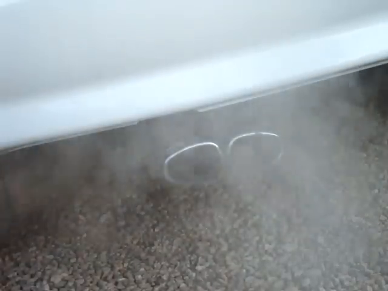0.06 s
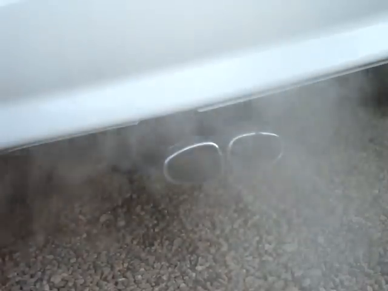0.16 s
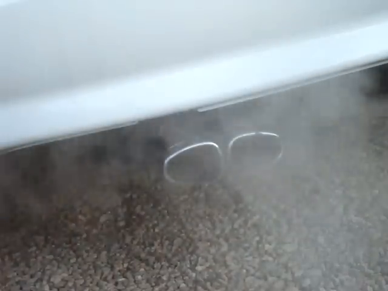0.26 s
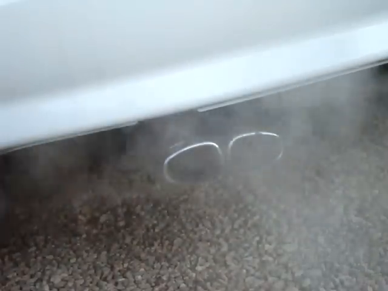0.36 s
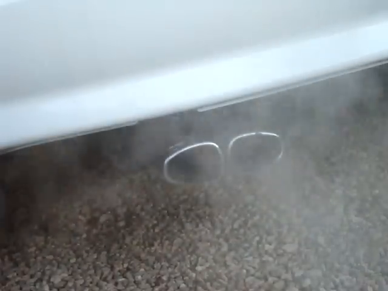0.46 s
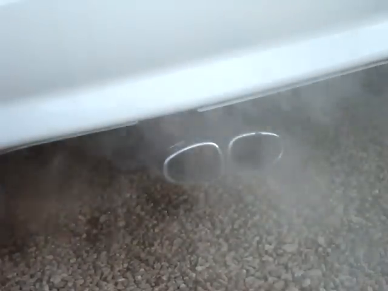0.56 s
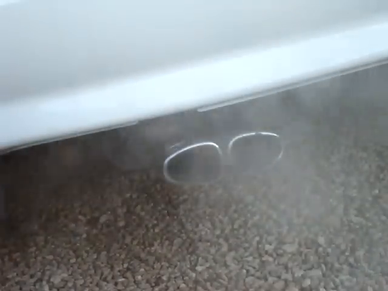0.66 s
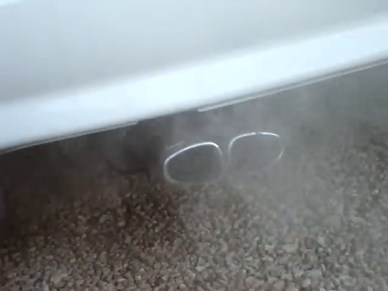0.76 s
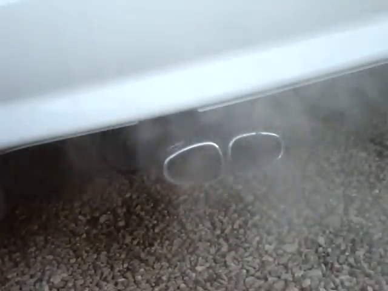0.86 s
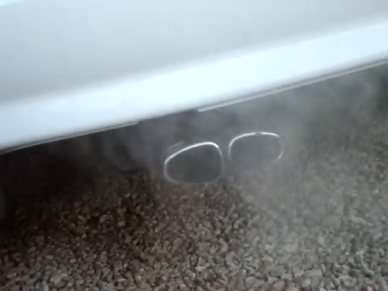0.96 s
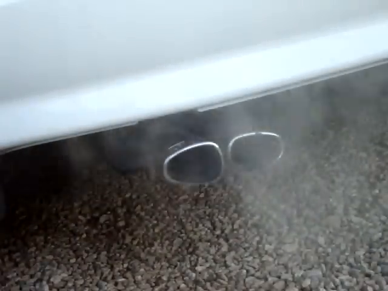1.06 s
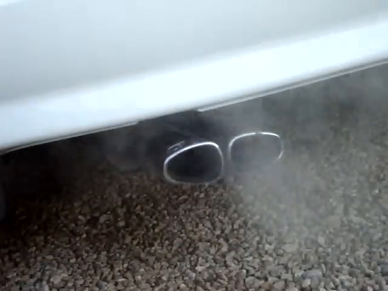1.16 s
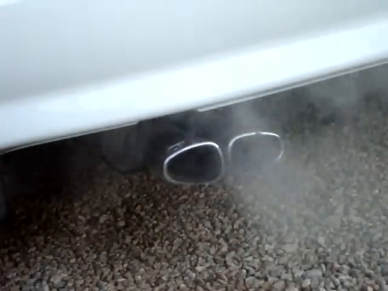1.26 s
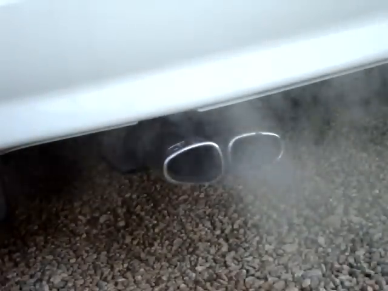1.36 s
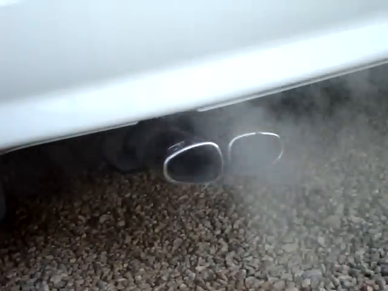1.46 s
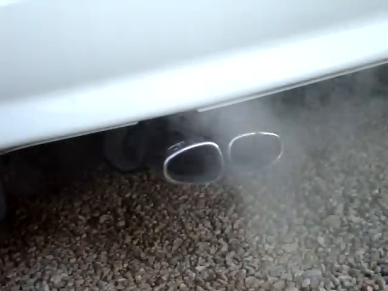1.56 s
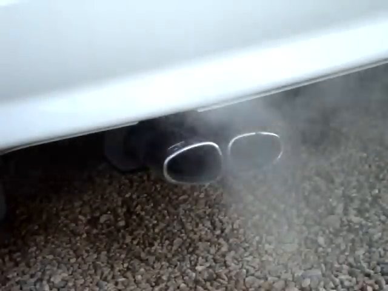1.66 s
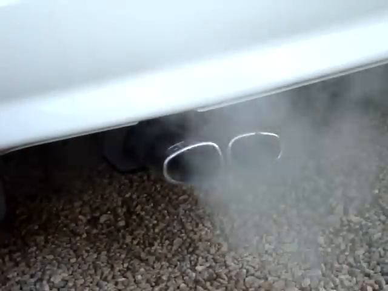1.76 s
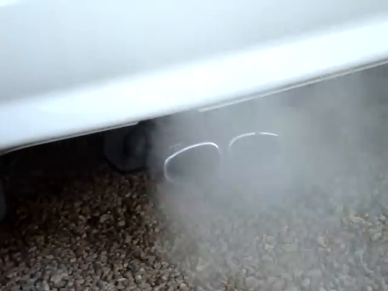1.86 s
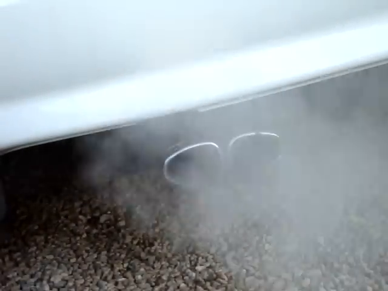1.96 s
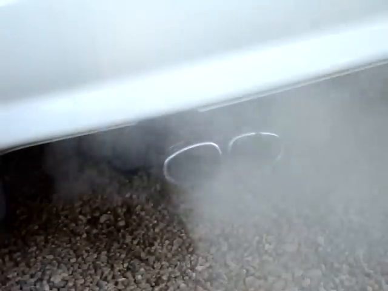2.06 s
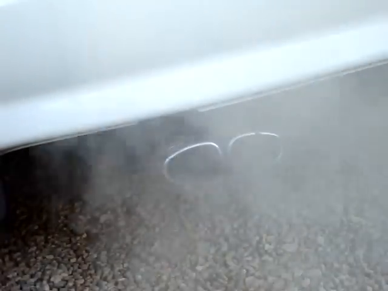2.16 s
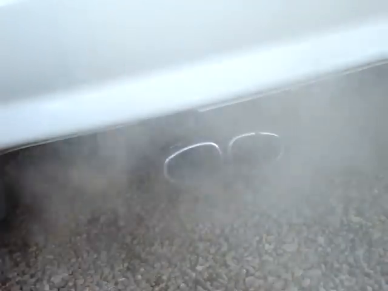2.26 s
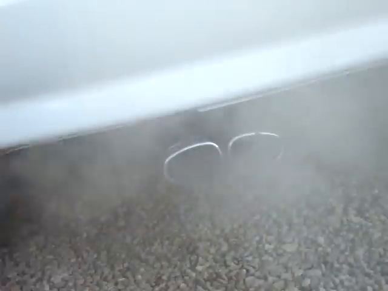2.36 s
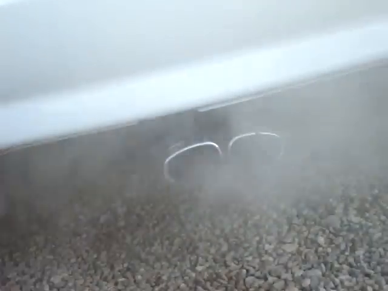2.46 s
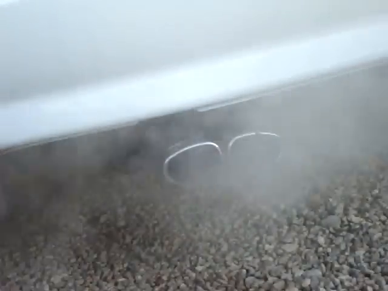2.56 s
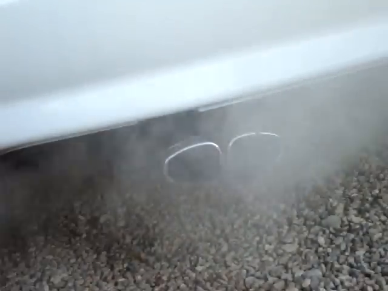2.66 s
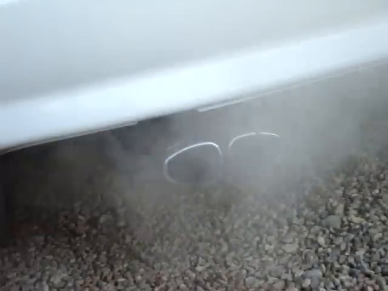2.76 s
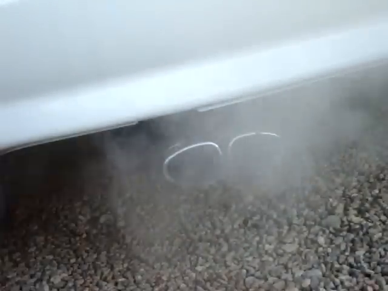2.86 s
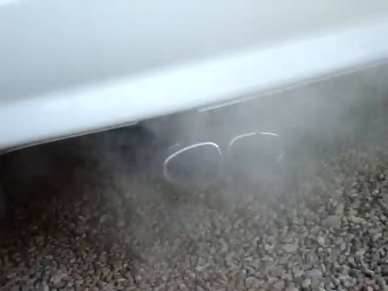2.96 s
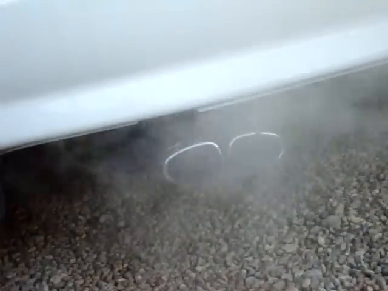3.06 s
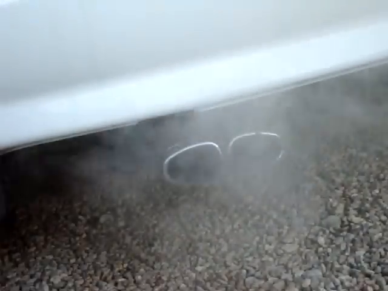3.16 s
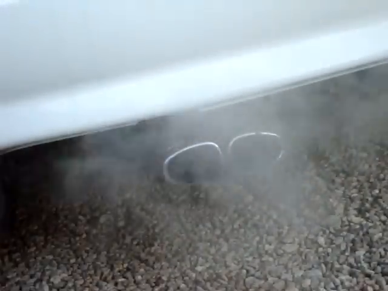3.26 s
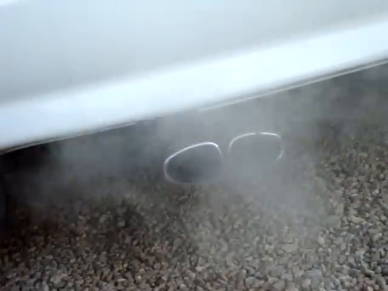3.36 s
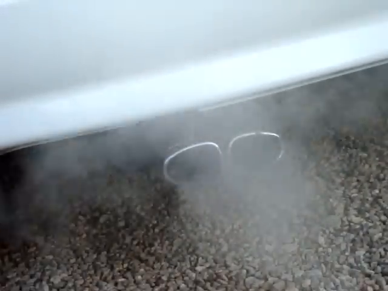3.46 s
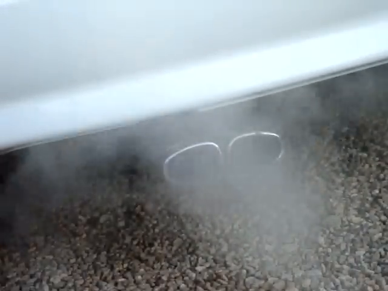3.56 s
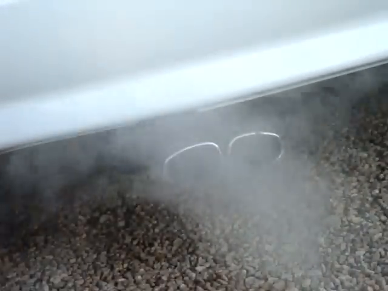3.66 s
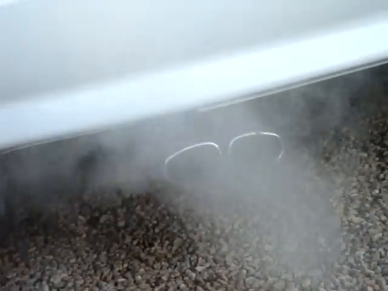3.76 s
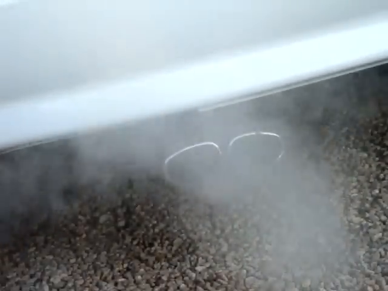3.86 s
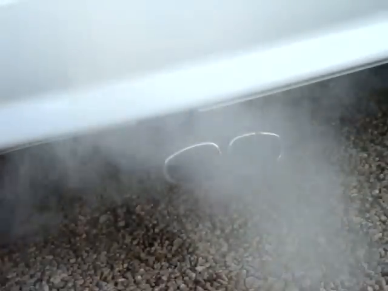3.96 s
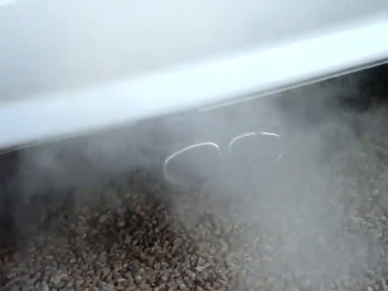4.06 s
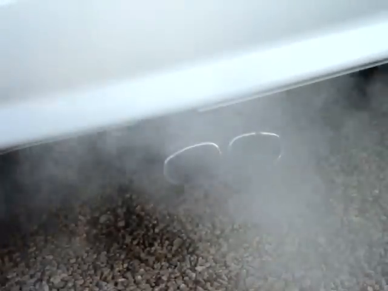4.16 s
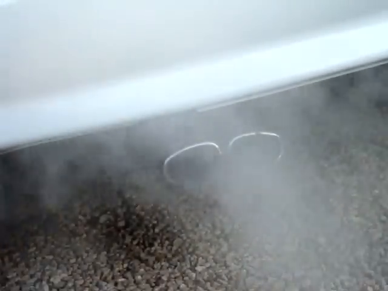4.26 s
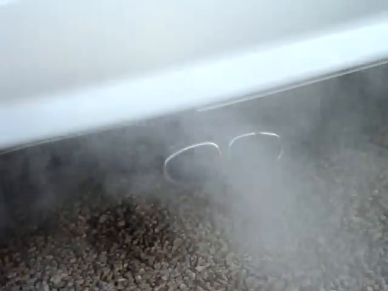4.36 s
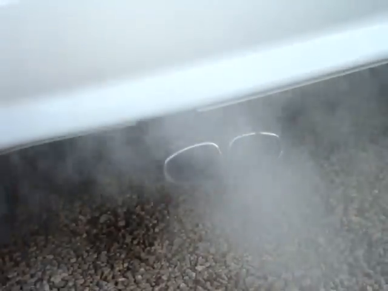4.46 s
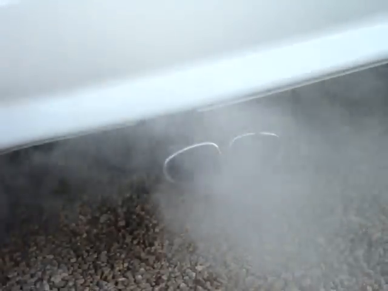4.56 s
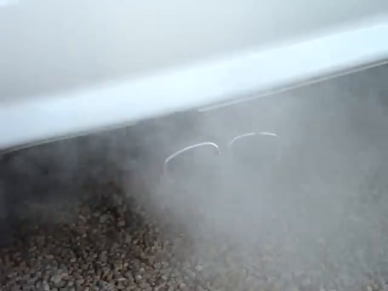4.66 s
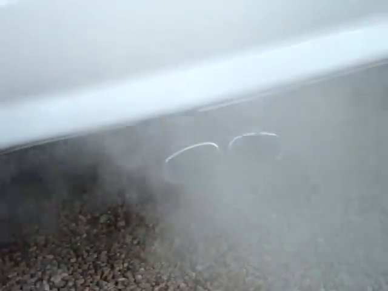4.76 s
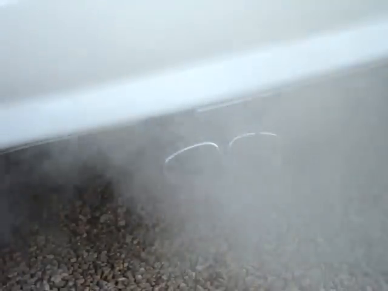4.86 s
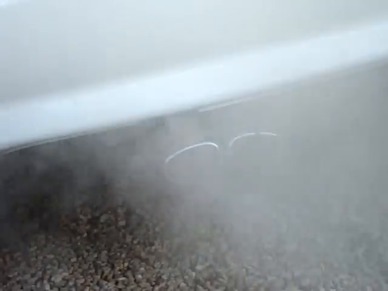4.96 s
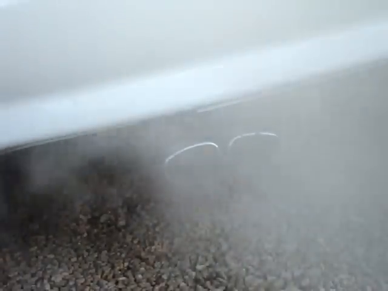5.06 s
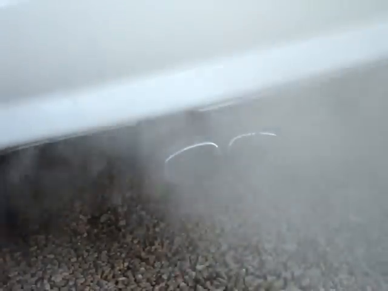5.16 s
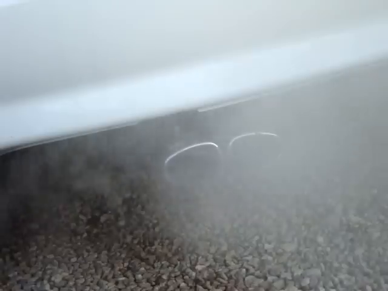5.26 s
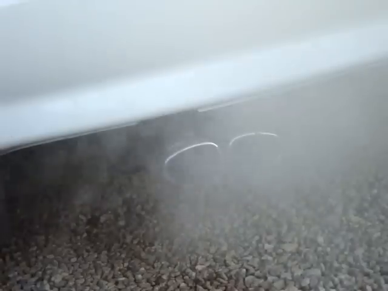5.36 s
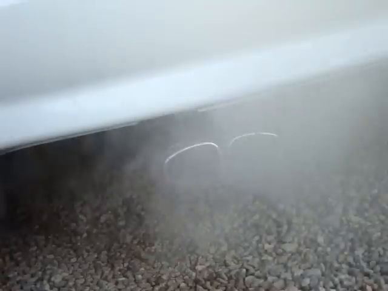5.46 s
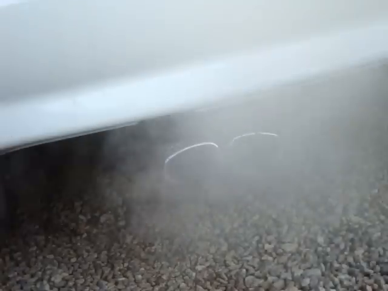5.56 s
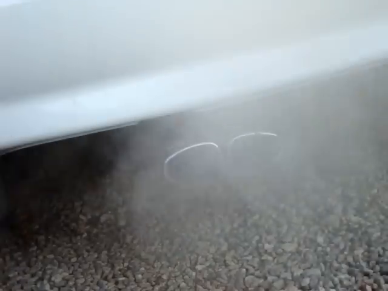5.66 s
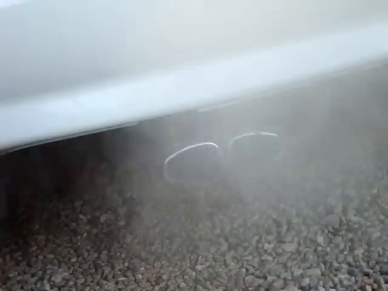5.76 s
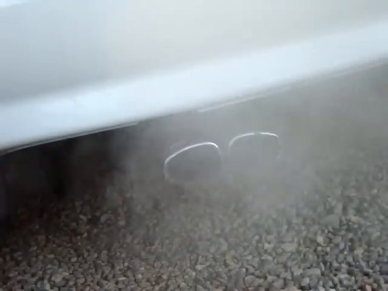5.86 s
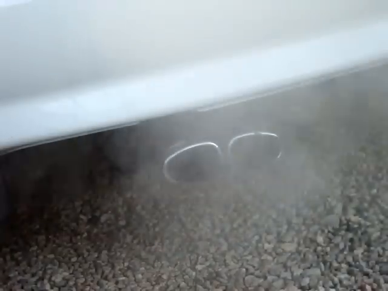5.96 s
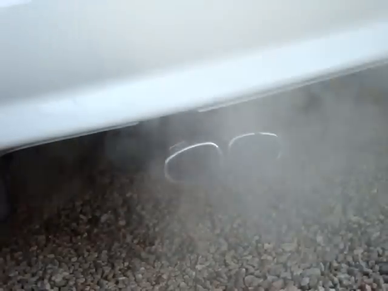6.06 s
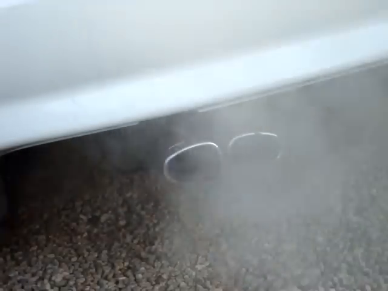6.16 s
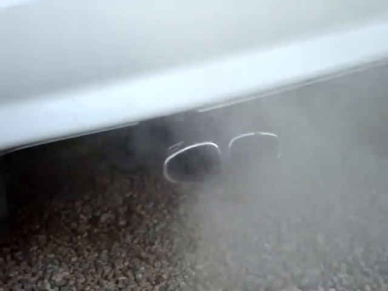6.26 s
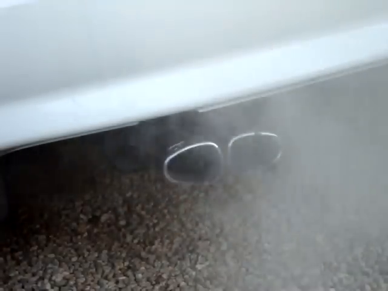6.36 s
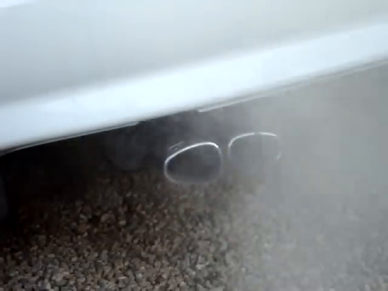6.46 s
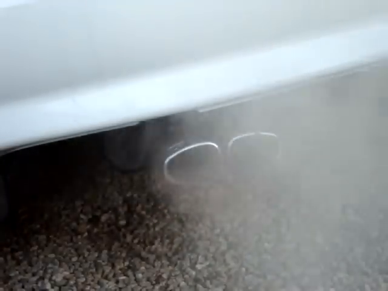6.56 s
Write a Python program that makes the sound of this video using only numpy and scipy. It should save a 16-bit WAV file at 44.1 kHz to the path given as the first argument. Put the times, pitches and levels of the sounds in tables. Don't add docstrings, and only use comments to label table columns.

```python
import sys
import numpy as np
from scipy import signal
from scipy.fft import rfft, irfft
from scipy.io import wavfile
from scipy.ndimage import uniform_filter1d, minimum_filter1d

SR = 44100
rng = np.random.default_rng(int(sys.argv[2]) if len(sys.argv) > 2 else 0)


def boost_factor(decibels):
    exponent = np.asarray(decibels, float) / 20
    return 10 ** exponent


def inscribe(sig):
    pcm = np.round(np.clip(np.atleast_2d(sig).T, -1, 1) * 32767)
    wavfile.write(sys.argv[1], SR, pcm.astype(np.int16))


N = 291501


def unit(x):
    return x / np.sqrt(np.mean(x ** 2))


def steady(x, span_s=0.11):
    k = int(span_s * SR)
    power = uniform_filter1d(uniform_filter1d(x ** 2, k), k)
    return x / np.sqrt(power + 1e-12)


def sos_filter(x, order, hz, kind):
    return signal.sosfilt(signal.butter(order, hz, kind, fs=SR, output="sos"), x)


def modes(x, table):
    total = 0
    for k, (hz, width_hz, db) in enumerate(table):
        b, a = signal.iirpeak(hz, hz / width_hz, SR)
        total = total + (-1) ** k * boost_factor(db) * signal.lfilter(b, a, x)
    return total


def clicks(s, size):
    place = np.clip(s * SR, 0, N - 2)
    i = place.astype(int)
    early = np.bincount(i, size * (1 - place + i), N)
    late = np.bincount(i + 1, size * (place - i), N)
    return early + late


def puff(x, decay_s, rise_s):
    for tau in (decay_s, rise_s):
        p = np.exp(-1 / (tau * SR))
        x = signal.lfilter([1 - p], [1, -p], x)
    return x * decay_s * SR


def push(s, size, length_s):
    window = np.hanning(int(length_s * SR) + 2)
    return np.convolve(clicks(s, size), window / window.sum())[:N]


def front(s, size):
    x = puff(clicks(s + .0012, size) - clicks(s, .7 * size), .0006, .00022)
    return 2 * sos_filter(x, 3, [170, 2400], "band")


def ramp(t, start_s, length_s):
    return np.clip((t - start_s) / length_s, 0, 1)


# f/Hz, spectral level/dB
AIR_SPECTRUM = [(20, -4.5), (40, -1.5), (90, -13), (200, 8), (600, 0), (1500, -34.5), (3500, -18.5),
                (10200, -28.5)]


def air():
    hz, db = np.transpose(AIR_SPECTRUM)
    shape = boost_factor(np.interp(np.log(np.fft.rfftfreq(N, 1 / SR) + 1), np.log(hz), db))
    hiss = irfft(rfft(rng.standard_normal(N)) * shape, N)
    return boost_factor(-44) * unit(hiss)


# t/s, length/s, start f/Hz, end f/Hz, level/dB
BIRD_NOTES = [(0.189, 0.06, 4360, 4560, -42), (0.246, 0.056, 4270, 3470, -48),
              (0.302, 0.027, 3290, 2960, -36.5), (1.029, 0.11, 4070, 3970, -46),
              (1.112, 0.07, 3580, 3450, -44.5), (1.145, 0.066, 4400, 4740, -45),
              (1.223, 0.023, 4600, 3700, -41), (1.257, 0.017, 3320, 3030, -31.5),
              (1.607, 0.087, 6630, 5660, -49), (2.505, 0.093, 3960, 3850, -62),
              (2.593, 0.042, 4000, 4800, -37), (2.573, 0.17, 3300, 3450, -42.5),
              (2.713, 0.014, 3130, 2880, -29.5), (3.82, 0.17, 4184, 3940, -37.5),
              (3.921, 0.024, 4850, 4460, -37), (3.924, 0.04, 3440, 3340, -31.5),
              (4.203, 0.094, 4620, 4360, -40), (4.286, 0.023, 3380, 3100, -36),
              (4.333, 0.065, 3230, 3040, -36), (4.432, 0.063, 3950, 4280, -39),
              (5.09, .06, 3890, 3700, -44), (5.899, 0.072, 3270, 4840, -40.5),
              (5.984, 0.057, 4570, 4530, -36), (5.941, 0.11, 3890, 3710, -38)]


def birds():
    dry = np.zeros(N)
    flutter = uniform_filter1d(uniform_filter1d(rng.standard_normal(N), size=45), size=45)
    for s, length_s, start_hz, end_hz, db in BIRD_NOTES:
        n = int(length_s * SR)
        u = np.arange(n) / n
        phase = 2 * np.pi * np.cumsum(start_hz + (end_hz - start_hz) * u) / SR
        start = int(s * SR)
        dry[start:start + n] += boost_factor(db) * np.sin(np.pi * u) * np.sin(phase)
    dry *= .6 + .6 * unit(flutter)
    lag = np.arange(SR // 4) / SR
    echoes = .022 * rng.standard_normal(len(lag)) * np.exp(-lag / .028)
    return .5 * dry + signal.fftconvolve(dry, echoes)[:N]


# t/s, front level/dB, boom level/dB, sizzle level/dB
POP_EVENTS = [(1.9035, -10, -24, -32), (4.547, -14, -24, -36), (4.5925, -15, -24, -36),
              (4.6145, -8, -22, -32), (4.6335, -14, -26, -35), (4.7365, -13, -24, -33),
              (5.2425, -13, -18, -31), (5.2755, -14, -17, -26), (5.3275, -17, -16, -31),
              (5.474, -30, -7, -50), (5.5345, -13, -22, -32), (5.56, -30, -30, -38), (5.577, -28, -12, -40),
              (5.6615, -30, -40, -36), (5.83, -40, -17, -55), (6.1385, -12, -24, -34),
              (6.1575, -13, -24, -33), (6.1775, -12, -26, -33)]


def pops():
    s, peak_db, boom_db, sizzle_db = np.transpose(POP_EVENTS)
    s = s + .002
    blow = 1.5 * front(s, boost_factor(peak_db))
    thump = modes(push(s, boost_factor(boom_db + 50), .002), [(275, 22, 0), (320, 40, -9)])
    fizz = modes(rng.standard_normal(N), TIP_MODES + RUSH_MODES)
    fizz = unit(sos_filter(fizz, 2, 4200, "low"))
    return blow + thump + puff(clicks(s, boost_factor(sizzle_db)), .012, .0006) * 1.3 * fizz


# down t/s, up t/s, fuel cut t/s, opening 0-1, afterburn fade/s
PEDAL_STROKES = [
    (1.71, 1.97, 2.36, 1, .03),
    (2.9, 3.82, 4.5, .085, .1),
    (4.49, 4.82, 5.2, 1, .4),
    (5.97, 6.3, 6.7, 1, .15),
]
# t/s, level change/dB, extra stumble 0-1
MISFIRES = [
    (2.899, -11.5, 0.28),
    (3.902, 3.5, 0.2),
    (5.2, -1, 0.12),
    (5.919, -9, 0.2),
]
MISS_S = 0.055


def driver(t):
    press_s, lift_s = .04, .1
    fill_s, tip_in_s = .08, .17
    idle, tip_in, coasting, overrunning = .07, .13, .025, .24
    throttle, burn, lurch, coast, overrun = np.zeros((5, N))
    for down, up, cut, opening, fade in PEDAL_STROKES:
        release = np.exp(-np.maximum(t - up, 0) / lift_s)
        throttle = throttle + opening * ramp(t, down, press_s / opening) * release
        afterburn = np.exp(-np.maximum(t - cut, 0) / fade)
        burn = np.maximum(burn, ramp(t, down, fill_s / opening) * afterburn)
        settle = np.exp(-np.maximum(t - down - press_s, 0) / tip_in_s)
        lurch = lurch + opening * ramp(t, down, press_s) * settle
        coast = np.where(t > down, opening * ramp(t, up, lift_s) * (t < cut), coast)
        overrun = np.where(t > down, ramp(t, cut, fill_s), overrun)
    stumble = idle + tip_in * lurch + (coasting - idle) * coast + (overrunning - idle) * overrun
    for s, _, extra in MISFIRES:
        stumble = stumble + extra * np.exp(-((t - s) / (2 * MISS_S)) ** 2)
    return throttle, burn, lurch, stumble


def howl(t, beat):
    swell = 0
    for _, _, cut, opening, _ in PEDAL_STROKES:
        swell = swell + opening * ramp(t, cut - .07, .05) * np.exp(-np.maximum(t - cut, 0) / .13)
    return boost_factor(-29) * swell * steady(modes(beat, [(516, 8.2, 0)]))


def sings(hz, mode_hz, width_hz, db):
    nearest_hz = hz * np.round(mode_hz / hz)
    return db * np.exp(-((mode_hz - nearest_hz) / width_hz) ** 6)


# t/s, level/dB
FIRING_LEVEL = [(0.5, -32), (1.66, -32.5), (1.8, -24.5), (2.0, -19), (2.33, -25), (2.75, -29.5),
                (2.98, -32), (3.3, -30), (3.87, -25), (4.05, -23.5), (4.46, -30), (4.58, -19),
                (5.15, -25.5), (5.5, -26), (6.0, -31), (6.09, -22), (6.35, -22), (6.61, -24.5)]
# idle level/dB, slope/(dB per octave of speed), burning fuel/dB,
# full throttle/dB, first lurch/dB, share of the firing level
GAS_LAW = (-45.5, 7, 7, 4, -0.8, 0.4267)
TIP_LAW = (-55, 3, 8, 11.5, 0.7, -0.0548)
BREATHING_LAW = (-63.5, -6.6, 5.5, 11.5, 2.5, 1.05)
LONG_PIPE_LAW = (-4.5, -7.5, 3.5, 3.5, 3, -0.25)
FUEL_EXPONENTS = [.5, 1.5, 1, 1]


def levels(t, hz, throttle, burn, lurch):
    level_db = np.interp(t, *np.transpose(FIRING_LEVEL))
    miss_db = sum(db * np.exp(-((t - s) / MISS_S) ** 2) for s, db, _ in MISFIRES)
    octaves = np.log2(hz / 26.24)
    rise_db = level_db - FIRING_LEVEL[0][1]
    layer_db = []
    for law, exponent in zip([GAS_LAW, TIP_LAW, BREATHING_LAW, LONG_PIPE_LAW], FUEL_EXPONENTS):
        causes = np.array([np.ones(N), octaves, burn ** exponent, throttle * burn ** exponent,
                           lurch * burn ** exponent, rise_db])
        layer_db.append(np.array(law) @ causes)
    rush_db, crack_db, thud_db, long_db = layer_db
    sing_db = sings(hz, 274.5, 12.3, 7.24) * ramp(hz, 43.3, 6.9) * (1 - np.clip(throttle, 0, 1))
    boom_db = level_db + miss_db + sing_db
    thud_db = thud_db + miss_db + sings(hz, 72.8, 8.7, 5.5)
    return boom_db, rush_db, crack_db, thud_db, long_db - sing_db


SHORT_BRANCH_BEATS = [.088, .597, 1.028, 1.68, 1.73, 1.76, 1.864, 1.985, 3.2, 4.06, 4.365, 4.55, 4.673,
                      4.801, 5.2, 6.024, 6.161, 6.295]


def firings(t, hz):
    turns = np.cumsum(hz) / SR
    at = np.interp(SHORT_BRANCH_BEATS, t, turns)
    whole = np.cumsum(np.round(np.diff(at, prepend=0)))
    turns = turns + np.interp(t, SHORT_BRANCH_BEATS, whole - at)
    return np.interp(np.arange(np.ceil(turns[0]), turns[-1]), turns, t)


def branch_sign(s):
    beat = np.searchsorted(s, np.array(SHORT_BRANCH_BEATS) - .003)
    count = np.arange(len(s))
    last = beat[np.maximum(np.searchsorted(beat, count, "right") - 1, 0)]
    return 1 - 2 * ((count - last) % 2)


# f/Hz, width/Hz, level/dB
BREATHING_MODES = [(79.5, 35, 14), (45.2, 53, -13)]


def thud(even):
    return steady(modes(modes(even, BREATHING_MODES), BREATHING_MODES))


# f/Hz, width/Hz, level/dB
TIP_MODES = [(1647, 33.3, 8), (1974, 198, -2.5), (2183, 10, 8.5), (2280, 210, -3), (2734, 307, 0.5),
             (3077, 233, -1.5), (3450, 650, -8), (5140, 730, -14), (6030, 710, -16.5), (9100, 1300, -41)]
# f/Hz, width/Hz, level/dB
PING_MODES = [(2130, 51, -4.5), (2490, 370, -4.5), (2930, 120, 4), (5000, 600, -9.5)]


def cracks(t, hz, s, hard, blast, tip_noise, jet_noise):
    hiss = unit(modes(tip_noise, TIP_MODES)) * (0.12 + blast)
    ping = 30 * modes(push(s + 0.001008, hard ** 2, 0.00011), PING_MODES)
    spit = hard * boost_factor(np.interp(s, t, 13.0 - 0.55 * hz))
    jet = puff(push(s, spit, 0.0077), 0.0055, 0.00029)
    return steady(hiss + ping) + 2.9 * jet * sos_filter(jet_noise, 2, [5200, 9000], "band")


# f/Hz, width/Hz, level/dB
RUSH_MODES = [(390, 44, -14), (490, 78, -11.5), (625, 53, -6), (750, 113, -9.5), (896, 34.4, -4),
              (1015, 117, -5), (1350, 436, -8.5), (1440, 172, -6.5), (1840, 150, -21.5)]
# f/Hz, width/Hz, level/dB
UPPER_MODES = [(369, 54, 0), (453, 26.4, 8.5), (461.4, 34.4, 7), (532.3, 7.7, 7.5), (643.6, 12, -3),
               (801.4, 45, -0.5)]


def gas_rush(hz, pedal, burn, s, hard, even, odd, blast, noise):
    pulsing = 0.25 + 0.19 * puff(even, 0.015, 0.0025) + 0.66 * blast
    gas = unit(modes(noise, RUSH_MODES)) * pulsing
    sung = steady(modes(even + .7 * odd, UPPER_MODES)) * (hz / 40) ** 1.1
    sung = sung * boost_factor(sings(hz, 460, 8.5, 1.9) + 0.83 * burn * (2 - np.clip(pedal, 0, 1)))
    return steady(steady(gas) + sung + 7.5 * front(s, hard ** 1.5))


# f/Hz, width/Hz, level/dB
SILENCER_MODES = [(273.5, 24.3, 0), (317.5, 24.2, -8)]
# f/Hz, width/Hz, level/dB
BRANCH_MODES = [(244, 13.5, -0.5), (272.5, 9.7, 3), (299.6, 34.5, -8)]
# f/Hz, width/Hz, level/dB
LONG_PIPE_MODES = [(135.3, 11.2, 1), (172.8, 22, -1.5), (194.7, 11.8, 7), (238.7, 7.6, 2.5)]


def pipe_boom(hz, even, odd, struck, long_db):
    def ring(x, table):
        swelling = modes(x[::-1], table)[::-1]
        return unit(struck * modes(x, table) + (1 - struck) * swelling)

    silencer = ring(even, SILENCER_MODES) + boost_factor(16.5 - 0.55 * hz) * ring(odd, BRANCH_MODES)
    silencer = sos_filter(silencer, 4, 205, "high")
    long_pipe = sos_filter(modes(even, LONG_PIPE_MODES), 4, 120, "high")
    return steady(silencer) + boost_factor(long_db) * steady(long_pipe)


# t/s, firing rate f/Hz
FIRING_RATE = [(1.7, 27.6), (1.86, 45.5), (1.99, 53.7), (2.15, 57.3), (2.34, 52.4), (2.82, 32.7),
               (3.02, 30.8), (3.85, 41.4), (4.16, 33.2), (4.45, 31), (4.76, 65.8), (4.93, 71.7),
               (5.15, 66.8), (5.37, 51), (5.98, 31.6), (6.28, 65), (6.42, 69.2), (6.61, 64.7)]
CYLINDER_LEVELS = [0, -2.4, -0.1, -1.96]


def engine():
    t = np.arange(N) / SR
    flywheel_s = .071
    hz = uniform_filter1d(np.interp(t, *np.transpose(FIRING_RATE)), int(flywheel_s * SR))
    pedal, burn, lurch, uneven = driver(t)
    boom_db, rush_db, crack_db, thud_db, long_db = levels(t, hz, pedal, burn, lurch)
    s = firings(t, hz)
    idle_throttle = .1
    throttle = np.interp(s, t, idle_throttle + (1 - idle_throttle) * pedal)
    stumble = np.interp(s, t, uneven)
    chance = rng.standard_normal((800, 3))[:len(s)].T
    size = boost_factor(np.resize(CYLINDER_LEVELS, len(s)) + 7 * stumble * chance[0])
    side = branch_sign(s)
    s = s + .002 * stumble * chance[1]
    even = push(s, size, .0012)
    odd = push(s + .004, size * side, .0012)
    struck = np.interp(t, s, throttle + 2 * stumble) > .6
    struck = uniform_filter1d(1. * struck, SR // 20)
    hard = throttle * size * boost_factor(1.2 * side + 1.2 * chance[2])
    blast = puff(clicks(s, hard), 0.0027, 0.0028)
    noise = rng.standard_normal((2, N))
    boom = boost_factor(boom_db) * pipe_boom(hz, even, odd, struck, long_db)
    rush = boost_factor(rush_db) * gas_rush(hz, pedal, burn, s, hard, even, odd, blast, noise[0])
    crack = boost_factor(crack_db) * cracks(t, hz, s, hard, blast, noise[1], noise[0])
    return boom + rush + crack + boost_factor(thud_db) * thud(even) + howl(t, even + odd)


def scene():
    return (air() + birds() + pops() + engine())[None]


def top_cut(x):
    return signal.sosfilt(signal.butter(12, 10320, fs=SR, output="sos"), x)


def record(dry):
    x = np.tanh(0.6 * sos_filter(dry, 2, 30, "high")) / 0.63
    for band_hz in ([4800, 6000], [6000, 7300], [7300, 11000]):
        treble = signal.sosfiltfilt(signal.butter(4, band_hz, "band", fs=SR, output="sos"), x)
        now_db = 10 * np.log10(uniform_filter1d(treble ** 2, size=300) + 1e-12)
        soon_db = -minimum_filter1d(-now_db, size=900, origin=-449)
        x = x - treble * uniform_filter1d(1. * (now_db < soon_db - 9), size=60)
    return top_cut(x)


dry = scene()
out = record(dry)
inscribe(out)
```